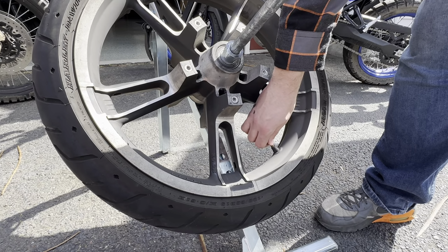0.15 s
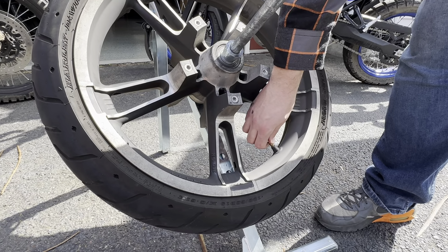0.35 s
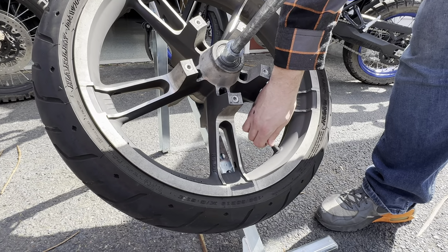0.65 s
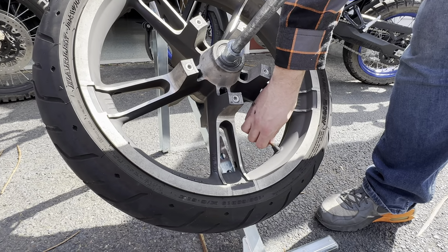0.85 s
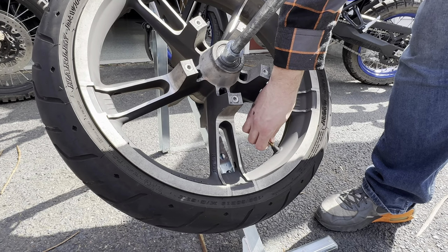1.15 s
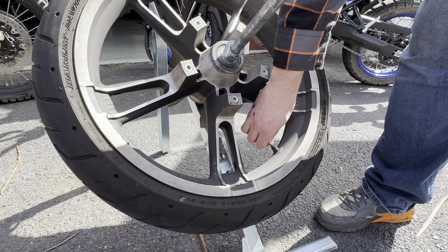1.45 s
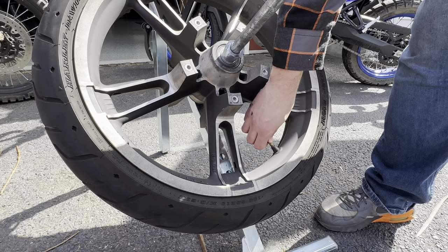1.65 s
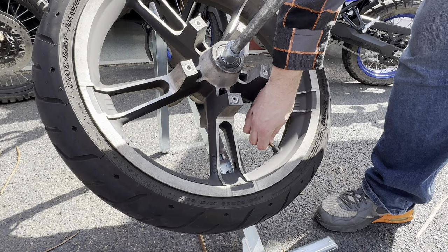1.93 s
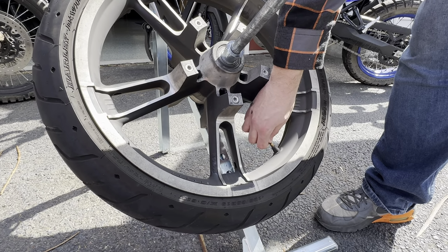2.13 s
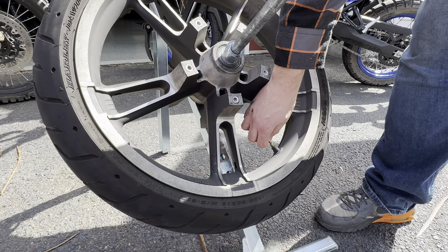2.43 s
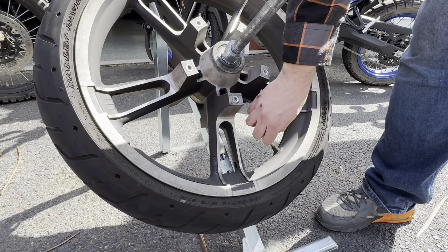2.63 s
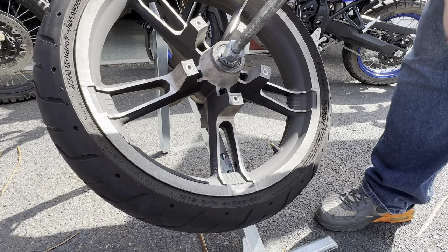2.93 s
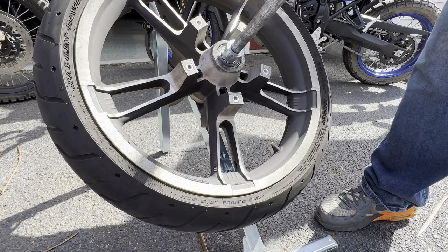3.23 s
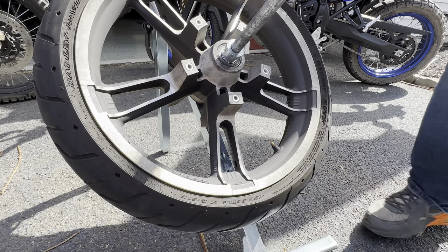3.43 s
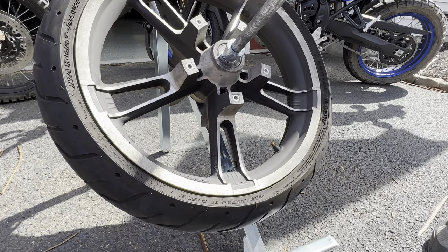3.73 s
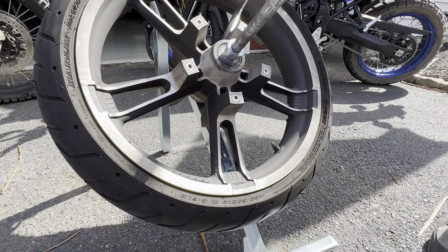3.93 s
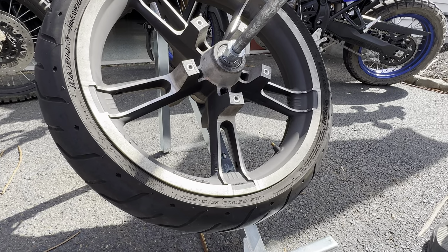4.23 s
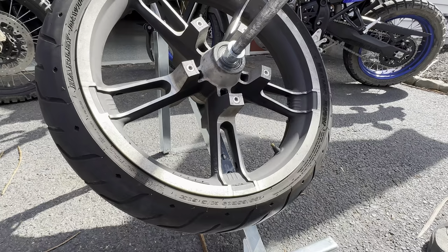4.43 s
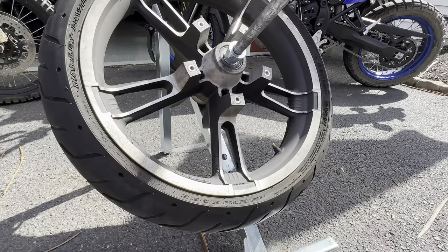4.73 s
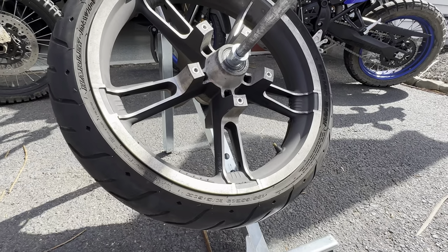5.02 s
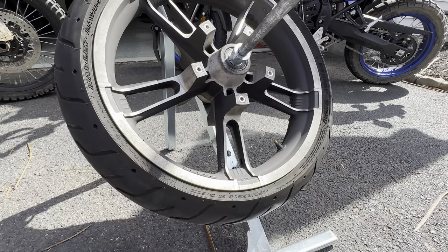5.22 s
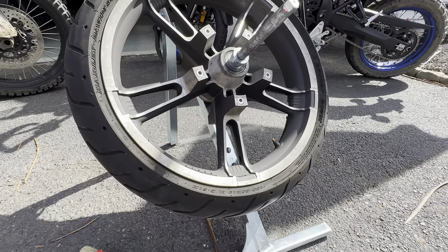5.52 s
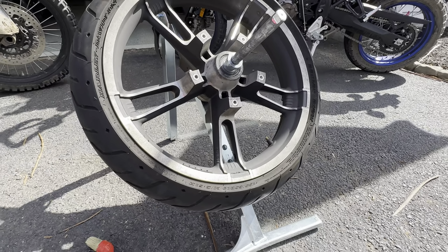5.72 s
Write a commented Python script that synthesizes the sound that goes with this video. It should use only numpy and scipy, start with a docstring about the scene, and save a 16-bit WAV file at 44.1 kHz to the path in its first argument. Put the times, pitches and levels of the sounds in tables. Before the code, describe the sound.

A motorcycle tire is deflated in the open air, heard from close up. Small, high hisses slip past the loosening valve core until a quick pop releases a strong, sputtering jet of air. The jet then evens out into a steady hiss that shifts in tone and gradually eases. Beneath it are a faint rumble and a fuzzy hum from inside the tire, which sounds twice, softer the second time.

```python
"""Outdoors, a hand unscrews the valve core of a motorcycle tire: air seeps past the thread in small spurts.
The core lets go with a pop, and the air jets against the fingers, spitting over a low rumble.
The hand lifts: the jet blows free and sets the air in the tire humming. The hum dies and returns softer
while the wheel turns a little, then fades as the hiss sinks with the pressure."""
import sys
import numpy as np
from scipy import signal
from scipy.fft import rfft, irfft
from scipy.io import wavfile
from scipy.ndimage import uniform_filter1d

SR = 44100
rng = np.random.default_rng(int(sys.argv[2]) if len(sys.argv) > 2 else 0)


def store_pcm(level_fs):
    """Save levels as 16-bit WAV."""
    pcm = np.round(np.clip(level_fs, -1, 1) * 32767).astype(np.int16)
    wavfile.write(sys.argv[1], SR, np.atleast_2d(pcm).T)


N = 258867
TIME, SPECTRUM_HZ = np.arange(N) / SR, np.fft.rfftfreq(N, 1 / SR)
FRAME_S, BIN_HZ = np.arange(N // 256 + 5) * 256 / SR, np.fft.rfftfreq(1024, 1 / SR)
TREBLE_OCTAVES = np.log2(np.maximum(BIN_HZ, 6500) / 10000)  # tilts pivot at 10 kHz, flat below 6.5 kHz
POP_S, LIFT_S = 1.6574, 2.69  # the core lets go; the hand leaves the valve

# the loose core shifts and the jet spits: (time [s], half length [s], centre [Hz], width [Hz], gain [dB])
SPITS = [(1.723, 0.023, 2500, 1500, 6), (1.77, 0.046, 5000, 9000, 4), (1.845, 0.015, 3500, 7000, 7),
         (2.0, .025, 1000, 400, 6.5), (2.035, 0.0054, 14900, 2600, 11), (2.083, 0.028, 2400, 2300, 7),
         (2.085, 0.015, 9000, 3000, 2), (2.27, 0.041, 13500, 4060, 6.3), (2.405, 0.023, 7000, 6000, -2),
         (2.47, 0.027, 9000, 1300, 4.5), (2.628, 0.017, 6000, 7100, 4), (2.672, 0.017, 2200, 1600, 8)]


def amp(db):
    """Decibels to gain."""
    return 10 ** (np.asarray(db) / 20)


def unit(x):
    """Scales to rms 1."""
    return x / np.sqrt(np.mean(x ** 2) + 1e-20)


def since(s, t=TIME):
    """Seconds gone by since the time s, zero before it."""
    return np.maximum(t - s, 0)


def ramp(s, length):
    """A smooth fade from 0 to 1 around the time s."""
    return .5 + .5 * np.tanh((TIME - s) / length)


def burst(start, end, db, swell_db, attack_s, release_s):
    """A gain envelope: attack, a hold that swells or sags, release."""
    held = np.clip((TIME - start) / (end - start), 0, 1)
    return amp(db + swell_db * held) * ramp(start, attack_s) * np.exp(-since(end) / release_s)


def curves(rows, t):
    """Every column of an automation table at the times t."""
    s, *columns = np.transpose(rows)
    return [np.interp(t, s, column) for column in columns]


def colour(points):
    """A broad EQ curve in dB at every bin."""
    hz, db = np.transpose(points)
    return np.interp(np.log(BIN_HZ + 1), np.log(hz), db)


def bell(hz, width_hz):
    """A Gaussian bell of height 1 over the bins."""
    return np.exp(-.5 * ((BIN_HZ - hz) / width_hz) ** 2)


def peaks(rows):
    """Peaks and notches in dB at every bin."""
    return sum(db * bell(hz, width) for hz, width, db in rows)


def surges(rows):
    """Passing boosts and cuts in the hiss, in dB over frames and bins."""
    return sum(db * np.exp(-.5 * ((FRAME_S[:, None] - s) / length) ** 2) * bell(hz, width)
               for s, length, hz, width, db in rows)


def noise(eq_db, patchy_db=0):
    """Noise of rms 1 through a still or moving EQ, with brief random eddies on top."""
    real, imag, eddies = rng.standard_normal((3, len(FRAME_S), len(BIN_HZ)))
    eddies = unit(uniform_filter1d(uniform_filter1d(eddies, size=7, axis=0), size=18, axis=1))
    spectra = (real + 1j * imag) * amp(eq_db + patchy_db * eddies)
    return unit(signal.istft(spectra.T, nperseg=1024, noverlap=768)[1][:N])


def steady_noise(response):
    """Noise of rms 1 through a gain curve over SPECTRUM_HZ."""
    return unit(irfft(rfft(rng.standard_normal(N)) * response, N))


def flutter(depth_db, rate_hz):
    """Random unsteadiness of a flow, as a gain."""
    response = SPECTRUM_HZ / (SPECTRUM_HZ + rate_hz / 10) / (1 + (SPECTRUM_HZ / rate_hz) ** 2)
    return amp(depth_db * steady_noise(response))


def split(x):
    """A crossover that splits a hiss into roar, middle and treble."""
    above_roar, above_middle = (1 / (1 + (hz / (SPECTRUM_HZ + 1)) ** 16) for hz in (1800, 6500))
    shares = (1 - above_roar, above_roar - above_middle, above_middle)
    return [irfft(rfft(x) * share, N) for share in shares]


def scatter(x, strength, count=24):
    """Spokes, rim and asphalt add many faint early echoes."""
    delay_s = rng.uniform(.003, .016, count)
    taps = np.zeros(SR // 10)
    taps[(delay_s * SR).astype(int)] = strength * rng.choice([-1, 1], count) / np.sqrt(count)
    taps[0] = 1
    return signal.oaconvolve(x, taps)[:N]


def jet(gains, eq_db, tilt_db_per_octave, patchy_db, echo):
    """Turbulent hiss whose roar, middle and treble each ride their own fader."""
    tilt_db = np.reshape(tilt_db_per_octave, (-1, 1)) * TREBLE_OCTAVES
    hiss = scatter(noise(eq_db + tilt_db, patchy_db), echo)
    return sum(gain * unit(band) for gain, band in zip(gains, split(hiss)))


def outdoors():
    """Distant traffic and open air lay down a quiet, dull bed."""
    # tone of the bed: (frequency [Hz], relative level [dB])
    bed_tone = [(15, -40), (28, -13), (50, 0.5), (105, -1.5), (170, -11.5), (300, -12), (520, -16),
                (800, -13), (1300, -18), (2000, -29), (4000, -48)]
    return amp(-64) * noise(colour(bed_tone), patchy_db=-1.5)


def tire_air(weak_s=4.96):
    """The outflow rumbles; the open stem blows a fuzzy hum from the tire. Both fade as the flow weakens."""
    # tone of the rumble: (frequency [Hz], relative level [dB])
    rumble_tone = [(50, -22), (120, -13), (200, -2), (330, 0.5), (420, 0.5), (520, -8), (650, -7.5),
                   (900, -23.5)]
    # resonances of the air in the tire: (frequency [Hz], half width [Hz], relative level [dB])
    cavity_modes = [(476, 13, 0), (438, 30, -7), (525, 30, -17)]
    held_db = -53 + np.interp(TIME, FRAME_S, surges(SPITS)[:, 0])
    gush_db = 8 * np.exp(-since(LIFT_S) / 0.34)
    free_db = -48 + gush_db - 2 * since(LIFT_S) - 10 * since(weak_s)
    rumble = amp(held_db + (free_db - held_db) * ramp(LIFT_S, 0.038)) * noise(colour(rumble_tone))
    cavity = sum(amp(db) / (1 + ((SPECTRUM_HZ - hz) / width) ** 2) for hz, width, db in cavity_modes)
    ringing = signal.hilbert(steady_noise(cavity))
    hum = unit(ringing.real / np.sqrt(1 + (0.38 * abs(ringing)) ** 2))  # saturation evens out the throbs
    first_blow = burst(2.678, 3.335, db=-36.5, swell_db=-9.53, attack_s=.018, release_s=0.066)
    soft_blow = burst(3.55, weak_s, db=-55.3, swell_db=3.7, attack_s=0.086, release_s=0.33)
    return rumble * ramp(POP_S, .002) + (first_blow + soft_blow) * hum


def seep():
    """Each twist of the core lets a thin hiss past the thread, over a faint leak."""
    # tone of the seep: (frequency [Hz], relative level [dB])
    seep_tone = [(500, -25), (1100, -18), (2300, -8.5), (4000, -12), (6000, -8.5), (8000, -0.5), (10000, 2),
                 (12300, -0.5), (14000, 0.5), (15800, -3.5)]
    # peaks and notches of the gap round the thread: (centre [Hz], width [Hz], gain [dB])
    thread_gap = [(1730, 143, -3.5), (2870, 91, -3.3), (3050, 37, 3.0), (4720, 61, -3.9), (5700, 108, -3.7),
                  (6000, 54, 3.2), (6490, 102, -3.3), (6770, 98, 4.4), (7470, 55, 2.8), (8090, 88, -2.9),
                  (8650, 65, 3.6), (9650, 197, 1.7), (12040, 54, 3.1), (12240, 88, -4.5),
                  (13000, 146, -2.5), (13320, 60, 3.3), (13980, 210, 2.1), (14560, 94, -2.7)]
    # twists that open the thread:
    # (start [s], end [s], treble level [dB], swell [dB], middle against treble [dB], tilt [dB/octave])
    twists = [(0.08, 0.168, -65, 7, -16, -4.5), (0.24, 0.455, -59, 2, -10, 1.5),
              (0.51, 0.58, -67, 5, -7, -2), (0.801, 0.836, -54, 0, -8.5, -2.5),
              (0.85, 1.0, -57.5, 2.5, -8, 2.5), (1.0, 1.103, -53.5, 4, -8, 4.5),
              (1.103, 1.133, -52, 0.5, -4, 1), (1.392, 1.468, -64.5, 7, -13, -3),
              (1.471, 1.535, -43.7, 1, -8, 1), (1.558, 1.655, -53, -1, -7.5, 1)]
    # the leak between twists: (time [s], treble level [dB])
    rest_leak = [(0.0, -64.5), (0.22, -68.5), (0.68, -73.5), (1.2, -67.5), (1.36, -70)]
    leak_middle_db, leak_tilt, middle_lag_s = -5, -2, 0.0052  # the lag makes each spurt end duller
    spurts = [burst(*row[:4], attack_s=0.011, release_s=.021) for row in twists]
    leak = amp(curves(rest_leak, TIME)[0])
    power = np.array(spurts + [leak]) ** 2
    middle_db, tilts = np.transpose([row[4:] for row in twists] + [(leak_middle_db, leak_tilt)])
    tilt = np.interp(FRAME_S, TIME, tilts @ power / power.sum(0))  # the loudest flow leads the tone
    hiss = noise(colour(seep_tone) + peaks(thread_gap) + tilt[:, None] * TREBLE_OCTAVES, patchy_db=1.5)
    roar, middle, treble = split(scatter(hiss, strength=0.3))
    body_gain = np.interp(TIME - middle_lag_s, TIME, np.sqrt(amp(middle_db) ** 2 @ power))
    body = body_gain * (middle + roar) / np.std(middle)
    sizzle = np.sqrt(power.sum(0)) * unit(treble)
    return (sizzle + body) * flutter(depth_db=.5, rate_hz=44) * (1 - ramp(POP_S, .002))


def pop():
    """The seal breaks: one short push of air rings the hollow of the hand."""
    # modes of the hollow: (frequency [Hz], level [dB], time to fall 60 dB [s])
    hand_modes = [(390, -55.5, .025), (790, -35, 0.02), (1130, -30.5, 0.018), (1900, -31, .008),
                  (3400, -33, .005), (5000, -43, 0.0037)]
    t = since(POP_S)
    return sum(amp(db - 60 * t / t60) * np.sin(2 * np.pi * hz * t) for hz, db, t60 in hand_modes)


def held_jet():
    """The jet breaks on core and fingers, stepping up as the core leaves its seat, then the thread."""
    # tone of the covered jet: (frequency [Hz], relative level [dB])
    held_tone = [(450, -40), (600, -17.5), (760, -8), (1500, -8), (3000, -6), (5500, -3.5), (8500, -1),
                 (11200, 0), (13000, -3), (15800, -5)]
    # peaks and notches of the hollow between hand and rim: (centre [Hz], width [Hz], gain [dB])
    hand_hollow = [(660, 26, -3.6), (850, 40, 2.1), (970, 39, -2.2), (1620, 47, -7.1), (2340, 36, -3.6),
                   (2480, 57, 3.0), (3090, 34, 2.0), (3230, 30, 2.8), (3590, 76, 3.6), (4280, 51, 2.0),
                   (4460, 32, -3.6), (4560, 32, 2.9), (4670, 27, -3.3), (4850, 31, -2.8), (5000, 38, 2.7),
                   (5560, 127, -3.0), (6160, 45, 4.1), (6430, 134, -2.2), (7060, 97, 2.2), (7340, 51, -2.8),
                   (7860, 87, 2.4), (8640, 63, 2.9), (8940, 41, 2.3), (11190, 81, 3.5), (11520, 134, -1.7),
                   (11860, 58, 1.9), (13720, 201, -1.6), (14290, 66, 3.3), (14570, 92, -2.1),
                   (15070, 61, 2.3)]
    unseated_db, clear_db = (-43.5, -35, -26), (-40, -28.5, -20.5)  # roar, middle, treble
    first_gap = amp(-16)
    opening = first_gap + (1 - first_gap) * ramp(1.687, 0.016)
    clear = ramp(2.06, 0.012)
    gains = [opening * amp(low + (high - low) * clear) for low, high in zip(unseated_db, clear_db)]
    tilt = 3 - 3.5 * (np.clip(FRAME_S, POP_S, LIFT_S) - POP_S)  # duller as the fingers give way
    eq_db = colour(held_tone) + peaks(hand_hollow) + surges(SPITS)
    hiss = jet(gains, eq_db, tilt, patchy_db=1.5, echo=0.23)
    gate = ramp(POP_S, .001) * np.sqrt(1 - ramp(LIFT_S, 0.027))
    return hiss * flutter(depth_db=0.3, rate_hz=62) * gate


def free_jet():
    """The jet leaves the open stem and sinks with the pressure; a moving reflection flanges it."""
    # tone of the free jet: (frequency [Hz], relative level [dB])
    free_tone = [(450, -20.5), (750, -9), (1400, -9), (2400, -6.5), (4000, -4), (6000, -1.5), (8500, 4),
                 (11500, 2), (14000, -1.5), (15800, -4)]
    # peaks and notches of the open valve stem: (centre [Hz], width [Hz], gain at depth 1 [dB])
    open_stem = [(680, 35, -3.3), (1230, 79, 1.4), (1770, 22, 2.5), (2330, 62, -2.5), (2460, 310, 2.9),
                 (2690, 34, 2.9), (2800, 39, -3.0), (3520, 202, 3.6), (4150, 32, 3.0), (4260, 300, -2.0),
                 (4730, 55, 2.3), (4940, 95, -2.4), (6200, 91, 1.4), (7260, 53, -3.0), (7460, 85, 1.8),
                 (7710, 57, -3.5), (8460, 193, 3.4), (9520, 141, -2.5), (10380, 197, -2.2),
                 (10940, 145, 3.9), (11760, 133, 2.2), (12380, 98, -3.1), (13000, 143, 2.1),
                 (14430, 197, -1.9)]
    # a near surface draws closer: (time [s], echo delay [ms], peak echo strength [ratio])
    reflection = [(2.75, 2.76, .35), (3.05, 2.6, .35), (3.25, 2.2, .25), (3.4, 1.45, .22), (3.68, 1.17, .4),
                  (3.9, 1.11, .42), (4.1, 1.03, .36), (4.45, .8, .22), (4.7, .6, 0)]
    # a bright hump climbs as the stem swings round: (time [s], centre [Hz], gain [dB])
    bright_hump = [(2.7, 3600, -1.5), (2.95, 4040, 2.5), (3.15, 5150, 1), (3.38, 5650, 0.5),
                   (3.6, 5900, -1), (3.8, 8000, 5.5), (4.3, 7800, 2), (4.7, 8500, -1)]
    # the jet swells and ebbs as the hand withdraws and the wheel turns:
    # (time [s], half length [s], centre [Hz], width [Hz], gain [dB])
    swells = [(2.75, 0.048, 3000, 8000, 2), (2.94, 0.057, 12000, 5000, 4), (3.02, 0.23, 5000, 11000, 3),
              (3.12, .22, 7200, 700, -3.5), (3.6, 0.21, 9700, 2980, -2.5), (4.2, 0.45, 8100, 1500, 0.5),
              (5.25, 0.09, 900, 700, -3.5), (5.5, 0.31, 9000, 1190, -2), (5.65, 0.22, 1320, 219, 2.5),
              (4.45, 0.17, 5170, 700, -2), (5.6, .35, 3530, 280, -1.5), (5.65, .2, 700, 200, -3)]
    t = FRAME_S[:, None]
    delay_ms, strength = curves(reflection, t)
    mirrored = strength * bell(5500, 3200)  # long waves bend round the surface, the shortest scatter
    comb_db = 20 * np.log10(abs(1 + mirrored * np.exp(2j * np.pi * BIN_HZ * delay_ms / 1000)))
    stem_depth = 0.48 + 0.3 * since(LIFT_S, t)  # the stem rings more plainly as the flow slows
    # a hollow hump grows, holds its pitch, then sinks with the pressure
    grown = .5 + .5 * np.tanh((t - 3.95) / 0.47)
    hollow_hz = 3710 - 1320 * since(4.37, t)
    bright_hz, bright_db = curves(bright_hump, t)
    humps_db = 3.5 * grown * bell(hollow_hz, width_hz=420) + bright_db * bell(bright_hz, width_hz=370)
    eq_db = colour(free_tone) + stem_depth * peaks(open_stem) + comb_db + surges(swells) + humps_db
    start_db, sag_db_per_s = (-48, -31.5, -28), (-2, -2.5, -0.97)  # roar, middle, treble
    gains = [amp(db + sag * since(LIFT_S)) for db, sag in zip(start_db, sag_db_per_s)]
    hiss = jet(gains, eq_db, tilt_db_per_octave=2.5, patchy_db=1.19, echo=0.24)
    return hiss * flutter(depth_db=0.25, rate_hz=86) * np.sqrt(ramp(LIFT_S, 0.011))


def scene():
    """All sources sit dead centre."""
    mono = seep() + pop() + held_jet() + free_jet() + tire_air() + outdoors()
    return np.array([mono, mono])


def record(dry):
    """The microphone drops the deepest bass, and a steep low-pass trims the very top."""
    high_pass = signal.butter(2, 38, "high", fs=SR, output="sos")
    low_pass = signal.firwin(801, 15780, window=("kaiser", 9), fs=SR)
    return signal.oaconvolve(signal.sosfilt(high_pass, dry), low_pass[None], "same", axes=1)


dry = scene()
out = record(dry)
store_pcm(out)
```